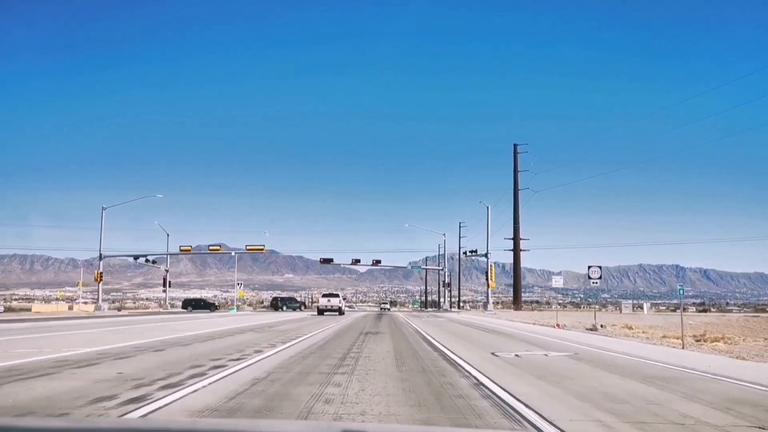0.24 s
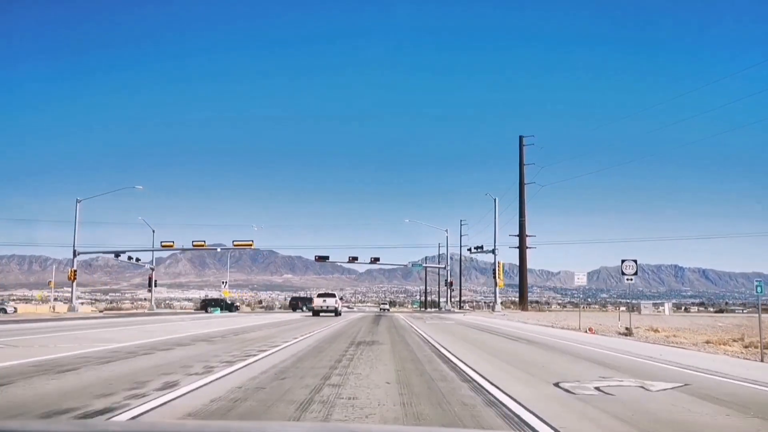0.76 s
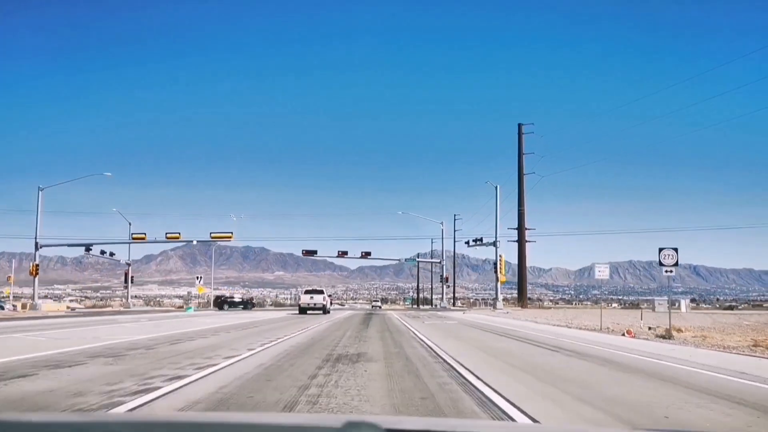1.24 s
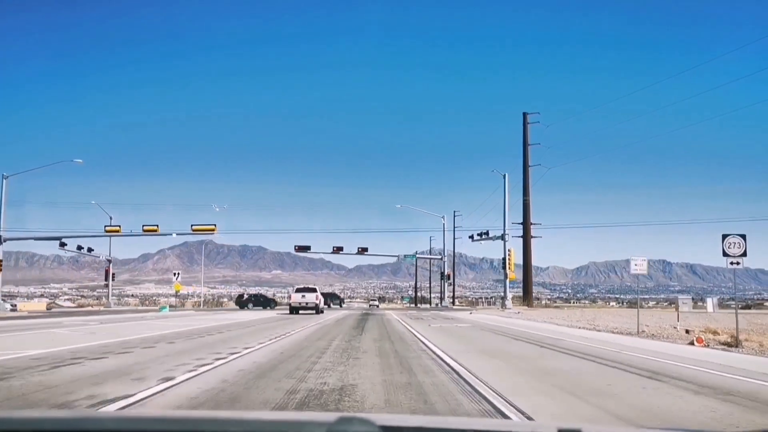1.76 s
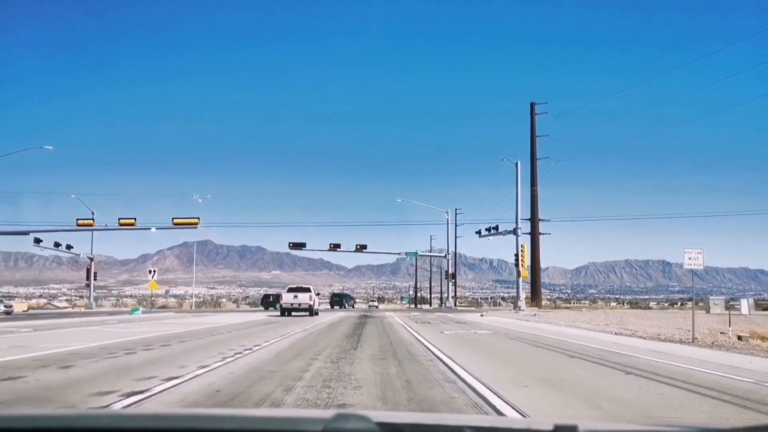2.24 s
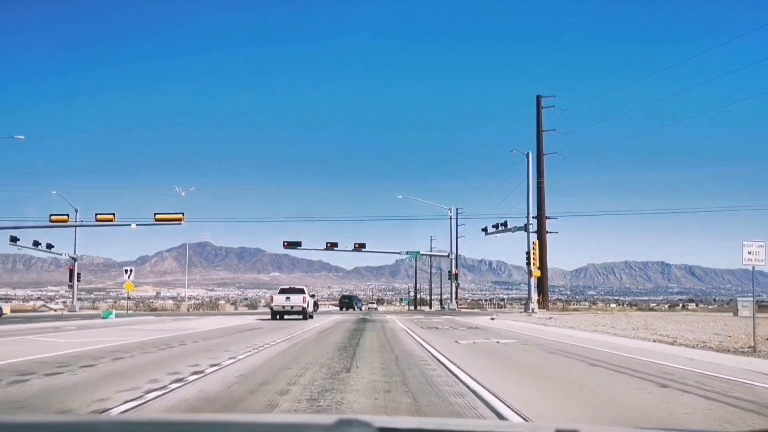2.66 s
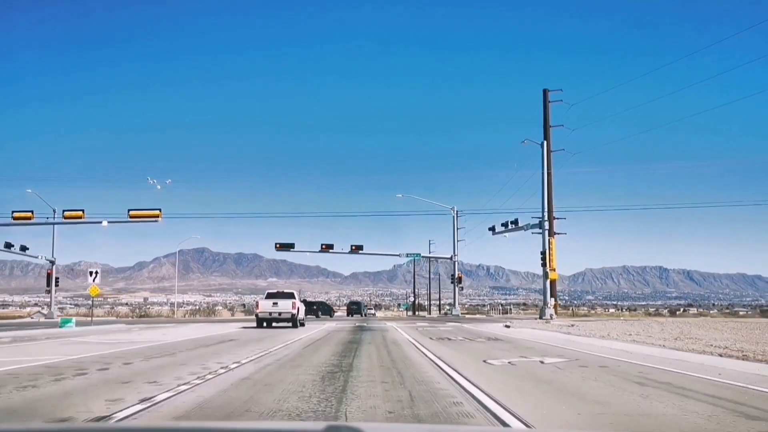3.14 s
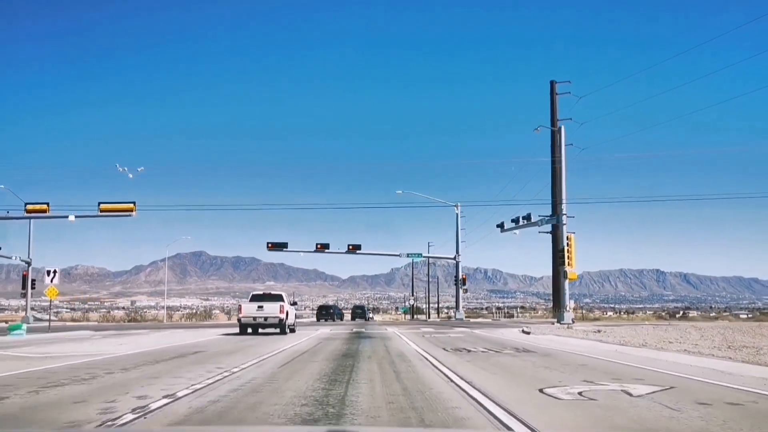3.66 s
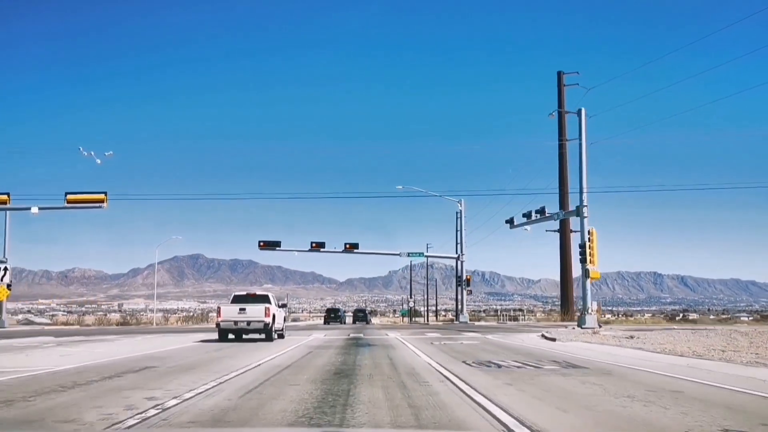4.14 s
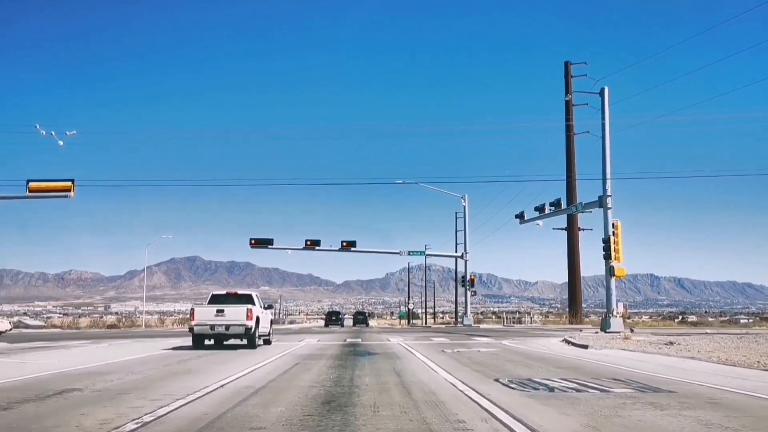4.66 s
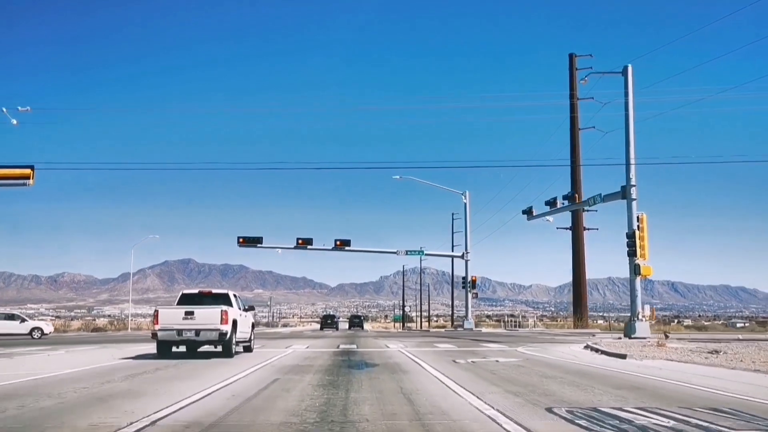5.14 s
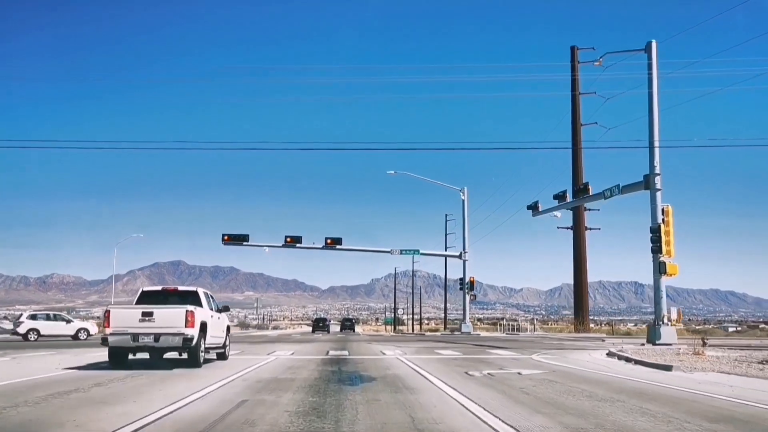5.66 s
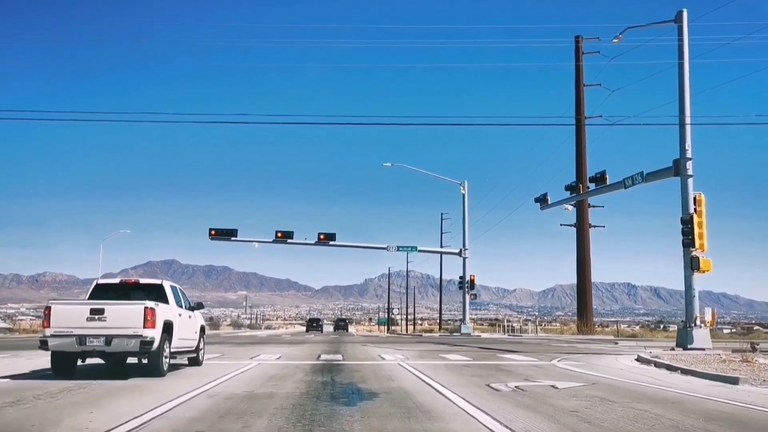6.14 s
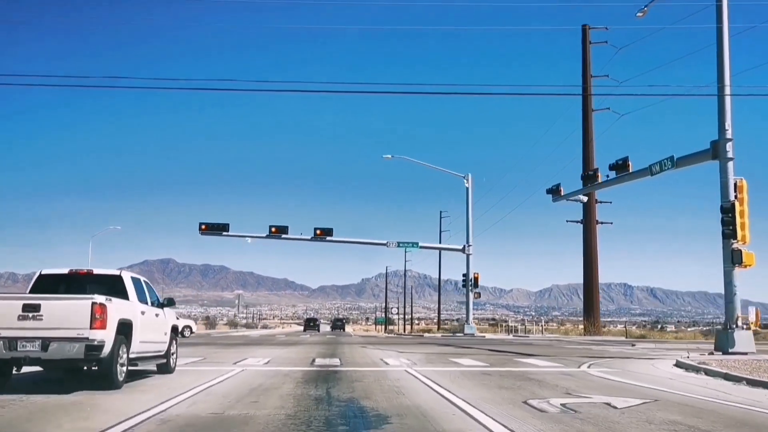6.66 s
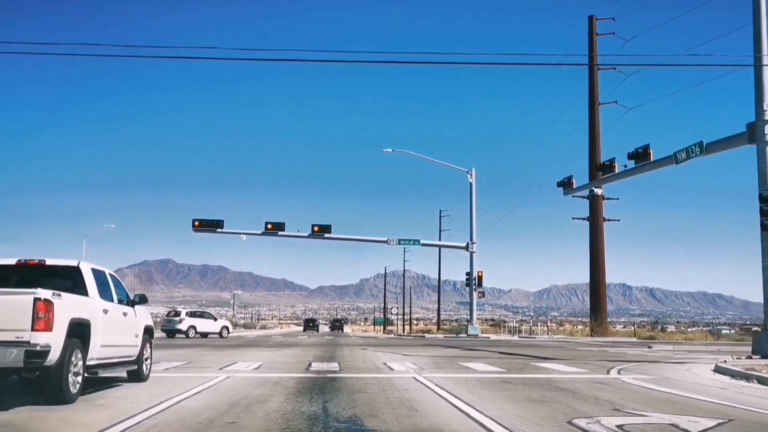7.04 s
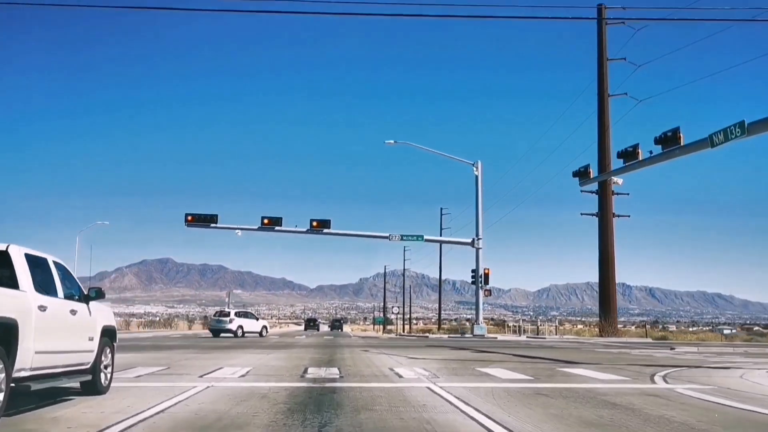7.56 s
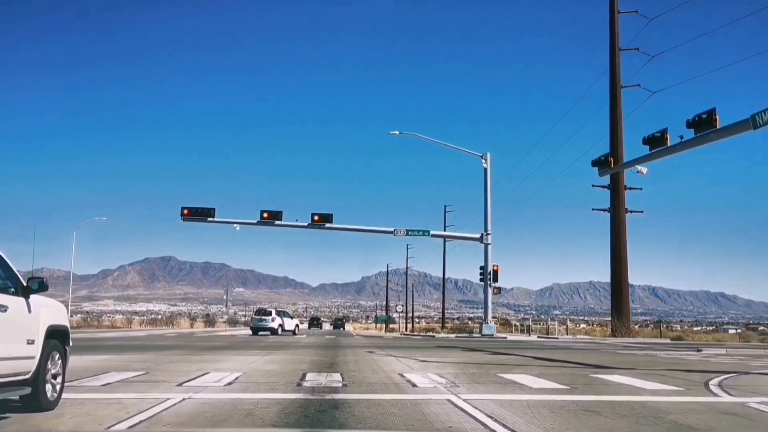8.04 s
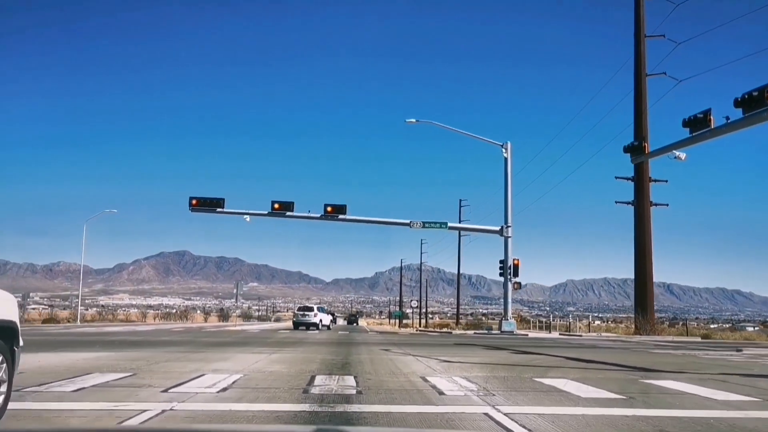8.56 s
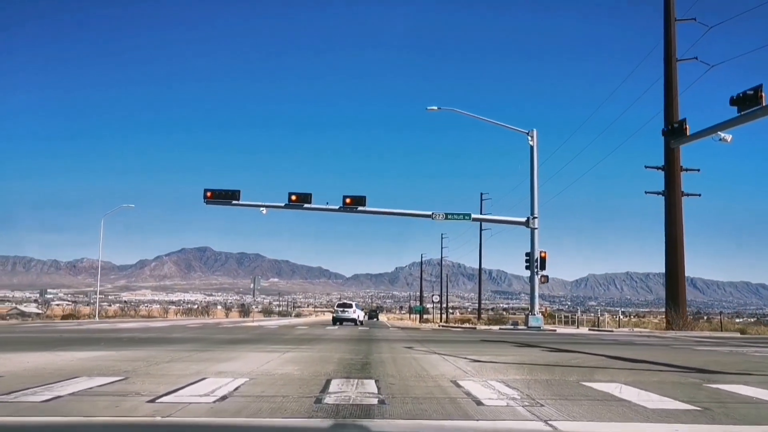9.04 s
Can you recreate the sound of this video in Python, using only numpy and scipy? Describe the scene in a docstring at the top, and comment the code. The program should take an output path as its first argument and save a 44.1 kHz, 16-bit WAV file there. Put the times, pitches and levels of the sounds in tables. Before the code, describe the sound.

Inside a slowing car, a deep booming road rumble and tyre hum sink steadily, with light rattles, a faint brake squeal and a late plastic click.

```python
"""The road shakes a car body into a low, booming rumble as the car coasts and brakes towards a red light.
The tyres hum lower and roar less as the speed falls, over grit crackle, scuffs and soft bumps; the engine hums.
Loose trim rattles at first, a brake squeals faintly in bursts, and plastic clicks near the end.
Small dashboard ticks come and go; vent air hisses throughout.
Noise is coloured and levelled by curves, hums are sines on pitch curves, struck parts are resonators."""
import sys
import numpy as np
from scipy import signal
from scipy.fft import rfft, irfft, next_fast_len
from scipy.io import wavfile
from scipy.ndimage import uniform_filter1d

SR = 44100
rng = np.random.default_rng(int(sys.argv[2]) if len(sys.argv) > 2 else 0)


def log_audio(samples):
    """Write samples as a 16-bit WAV file to the path given in sys.argv[1]."""
    # one column per channel
    frames = np.atleast_2d(samples).T
    # limit to full scale, then quantise
    limited = np.clip(frames, -1, 1)
    pcm = np.round(limited * 32767).astype(np.int16)
    wavfile.write(sys.argv[1], SR, pcm)


N = 410113
TIME = np.arange(N) / SR

# car speed as a share of a reference speed [time_s, speed_share]
SPEED = [(0, 0.96), (1.5, 0.78), (3, 0.66), (4.2, 0.52), (5.4, 0.42), (6.9, 0.31), (7.6, .26), (9.3, 0.22)]
# worn asphalt on the way up to the junction [time_s, extra_shake_db]
WEAR = [(0, 2), (1.3, -0.5), (2.1, 1), (3.9, -1.5), (4.4, 2), (5.7, 6.5), (6.4, 6), (7.15, 6), (7.45, 1),
        (8.2, 1.5), (9.3, -1.5)]
# noise colours of vent air and tyre scuffs [freq_hz, relative_db_per_hz]
VENT = [(500, -2), (1500, 11.5), (2400, 5.5), (3100, 1.5), (4000, -1), (4500, 1), (5200, -3.5), (5650, -6),
        (6600, -5.5), (7500, -8), (9300, -9.5), (10500, -5), (12500, -10.5), (16000, -12)]
SCUFF = [(700, 1), (1500, 3), (2300, 0.5), (3000, -7.5), (5100, -14), (5900, -22), (9000, -25)]


def from_db(db):
    """Decibels to gain."""
    return 10 ** (np.asarray(db) / 20)


def rms_one(x):
    """Scale to unit power."""
    return x / np.sqrt(np.mean(x ** 2) + 1e-20)


def in_time(rows):
    """Each column of a curve, sample by sample."""
    s, *columns = np.transpose(rows)
    return [np.interp(TIME, s, c) for c in columns]


def at_hz(points, hz):
    """Read a table along log frequency."""
    f, value = np.transpose(points)
    return np.interp(np.log(hz), np.log(f), value)


def hump(x, centre, width):
    """A bell of height 1, down to 1/e at one width from the centre."""
    return np.exp(-np.minimum(((x - centre) / width) ** 2, 50))


def drift(rate_per_s):
    """Random wander of unit power through 4096 knots; once they run out, the last value holds."""
    knots = rng.standard_normal(4096)
    return rms_one(np.interp(TIME * rate_per_s, np.arange(len(knots)), knots))


def by_speed(level_db, fall_db):
    """Level at the reference speed, less fall_db for each tenfold drop in speed."""
    speed, = in_time(SPEED)
    return level_db + fall_db * np.log10(np.maximum(speed, 1e-3))


def cabin_noise(colour, steady_s=0):
    """Stereo noise: long waves reach both ears alike, those near 1-2 kHz differ most, high treble is alike again."""
    # likeness of the two ears [freq_hz, correlation]
    likeness = [(30, .993), (150, .98), (300, .87), (550, .58), (900, .15), (1400, -.22), (2200, .05),
                (4500, .3), (8000, .75), (12000, .98)]
    # level balance of the ears [freq_hz, left_minus_right_db]
    balance = [(30, -4), (80, -3.5), (170, -1.3), (550, 1), (1000, -1.5), (1300, -0.5), (1600, -2.5),
               (1920, -7.5), (2120, -5), (2340, -3.5), (3200, 0), (4500, -2), (5200, -4), (8000, 0),
               (13000, 5)]
    # phase lead of the right ear [freq_hz, lead_rad]
    right_lead = [(30, .1), (90, 0.32), (170, 0.14), (400, 0.016)]
    size = next_fast_len(N)
    hz = np.maximum(np.arange(size // 2 + 1) * SR / size, 1)
    octaves_outside = np.abs(np.log2(hz / np.clip(hz, colour[0][0], colour[-1][0])))
    gain = from_db(at_hz(colour, hz) - 30 * octaves_outside)
    alike = np.clip(at_hz(likeness, hz), -.999, .999)
    mid, side = rfft(rng.standard_normal((2, size)))
    ears = np.array([[1], [-1]])
    pair = np.sqrt(1 + alike) * mid + ears * np.sqrt(1 - alike) * side
    pair = pair * np.exp(-.5j * ears * at_hz(right_lead, hz))
    pair = pair * gain * from_db(ears * at_hz(balance, hz) / 2)
    x = irfft(pair, size)[:, :N]
    power = x.mean(axis=0) ** 2
    if steady_s:  # even out the power over this span
        span = max(int(steady_s * SR), 2)
        smooth_power = uniform_filter1d(uniform_filter1d(power, span), span)
        return x / np.sqrt(smooth_power + 1e-20)
    return x / np.sqrt(power.mean())


def tone(hz):
    """A sine of unit power along a pitch curve."""
    return np.sqrt(2) * np.sin(2 * np.pi * np.cumsum(hz) / SR)


def ring(drive, hz, t60_s):
    """Two-pole resonator: a unit click starts a decaying sine of initial height 1."""
    r = from_db(-60 / (t60_s * SR))
    w = 2 * np.pi * hz / SR
    return signal.lfilter([0, np.sin(w)], [1, -2 * r * np.cos(w), r * r], drive + 1e-18)


def panned(x, left_db):
    """Make the left ear louder than the right by left_db."""
    return x * from_db(np.array([[.5], [-.5]]) * left_db)


def chatter(events, colour, rough_db):
    """Short, uneven noise bursts of tiny contacts, rising and falling exponentially."""
    bursts = 0
    for s, db, decay_s in events:
        bursts = bursts + from_db(db) * np.exp(-np.minimum(np.abs(TIME - s) / decay_s, 30))
    return bursts * from_db(rough_db * drift(400)) * cabin_noise(colour)


def shudders(events, colour):
    """Brief noise swells, each shaking one damped resonance."""
    shake = cabin_noise(colour)
    out = 0
    for s, db, half_width_s, hz in events:
        out = out + from_db(db) * hump(TIME, s, half_width_s) * rms_one(ring(shake, hz, t60_s=0.023))
    return out


def reflected(x, echo_db, count=10):
    """Early echoes off glass and dashboard ripple the spectrum."""
    out = x.copy()
    lags_s = rng.uniform(.001, .012, count)
    for lag in (lags_s * SR).astype(int):
        out[:, lag:] += rng.choice([-1, 1]) * from_db(echo_db) * x[:, :-lag]
    return out / np.sqrt(1 + count * from_db(2 * echo_db))


def patchy(x, count=12):
    """Overlapping treble bands swell and sink separately; the end bands take all beyond them."""
    size = next_fast_len(N)
    spectrum = rfft(x, size)
    hz = np.arange(size // 2 + 1) * SR / size
    centres_hz = np.geomspace(2400, 6500, count)
    out = 0
    for weights in np.eye(count):
        band = irfft(spectrum * np.interp(hz, centres_hz, weights), size)[:, :N]
        out = out + band * from_db(2.8 * drift(30))
    return out


def body():
    """Uneven asphalt bounces the wheels, shakes the shell and makes panels boom; smooth patches calm it."""
    # wheels on springs, shell rumble, lower and upper panel boom [freq_hz, relative_db_per_hz]
    bounce_colour = [(10, -22.5), (18, -2), (24, -2), (31, -0.5), (38, -5.5), (50, -26)]
    rumble_colour = [(24, -11.5), (32, -4.5), (39, 4.5), (49, 1), (58, -7.5), (72, -23.5)]
    boom_colour = [(52, -19), (66, -4.5), (76, 2), (92, 0), (105, -1), (135, -8), (153, -15), (180, -30.5)]
    upper_colour = [(135, -21.5), (158, -4), (178, 0), (205, -0.5), (218, -4.5), (232, -9), (280, -31.5)]
    # wheels dropping into dips [time_s, half_width_s, rumble_lift_db, boom_lift_db]
    jolts = [(.37, 0.16, 5, 2), (.728, 0.068, 4.5, 9), (.95, 0.075, 6, 2.5), (1.3, 0.098, -0.5, 6),
             (1.51, 0.11, 2.5, 5), (1.887, 0.066, -2.5, 4), (2.63, 0.067, -0.5, 4), (2.78, 0.019, 6, 2.5),
             (3.45, 0.19, 1.5, -0.5), (3.743, 0.027, 5, 5), (4.171, 0.027, 8.5, 5), (4.573, 0.063, 2, 5),
             (5.8, 0.054, -0.5, 5), (6.575, .035, 6.5, 8), (6.83, 0.08, -3.5, 4.5), (7.15, .1, 3.5, 2),
             (8.918, 0.11, 6.5, -2.5), (9.22, .072, -.5, 6)]
    # smooth asphalt [time_s, half_width_s, rumble_drop_db, boom_drop_db]
    lulls = [(1.7, 0.098, 0.5, 5.5), (2.23, 0.074, 7, -2), (2.95, 0.097, 6, 1), (3.88, 0.063, 6, 0.5),
             (5.07, 0.04, 12, 6), (6.33, 0.15, 5, 0.5)]
    # side whose wheels shake more [time_s, extra_left_minus_right_db]
    lean = [(0, 1), (2.3, 0.5), (3.8, -1), (7.2, -1), (8.1, 1.5)]
    wear_db, = in_time(WEAR)
    lean_db, = in_time(lean)
    shake_db = wear_db + 2.0 * drift(18)
    surge_db = 2.0 * drift(16)
    for rows, sign in ((jolts, 1), (lulls, -1)):
        for s, half_width_s, rumble_change_db, boom_change_db in rows:
            swell = sign * hump(TIME, s, half_width_s)
            shake_db = shake_db + rumble_change_db * swell
            surge_db = surge_db + boom_change_db * swell
    bounce_db = by_speed(-33.5, fall_db=8.5) + shake_db
    rumble_db = by_speed(-24.5, fall_db=19) + shake_db
    boom_db = by_speed(-24.5, fall_db=21) + 0.46 * wear_db + surge_db
    upper_db = by_speed(-32, fall_db=24) + 0.96 * surge_db
    bounce = from_db(bounce_db) * cabin_noise(bounce_colour, steady_s=0.31)
    rumble = from_db(rumble_db) * cabin_noise(rumble_colour, steady_s=0.15)
    boom = from_db(boom_db) * cabin_noise(boom_colour, steady_s=0.1)
    upper = from_db(upper_db) * cabin_noise(upper_colour, steady_s=0.22)
    return panned(bounce + rumble, lean_db) + panned(boom + upper, 1.2 * lean_db)


def tyres():
    """Tread drone, rolling roar and a rush of air and tread hiss, all fading as speed falls."""
    # noise colours [freq_hz, relative_db_per_hz]
    drone_colour = [(190, -31.5), (228, -0.5), (285, 1), (315, -6.5), (340, -3), (385, -8), (425, -19),
                    (520, -46.5)]
    roar_colour = [(300, -15), (400, -3), (450, -2), (515, 1.5), (560, -1.5), (610, 1), (700, -5.5),
                   (770, -8.5), (950, -11.5), (1080, -18), (1220, -19.5), (1700, -34)]
    rush_colour = [(650, -7), (800, 5), (1000, 10), (1180, 0), (1300, 3), (1540, 5.5), (1680, -1.5),
                   (1820, 1), (1920, 6), (2060, -1), (2340, 3.5), (2470, -8.5), (2600, -6.5), (3100, -12.5),
                   (5000, -25), (5700, -29), (12000, -36)]
    speed, = in_time(SPEED)
    wear_db, = in_time(WEAR)
    grain = drift(40)  # road surface texture
    # the tread pattern meets the tyre's air resonance near one speed share
    cavity_db = 1.5 * hump(speed, centre=0.48, width=0.18)
    drone_db = by_speed(-39.5, fall_db=19) + cavity_db
    roar_db = by_speed(-49.5, fall_db=24) + 1.2 * grain
    rush_db = by_speed(-57, fall_db=41.5) + 0.31 * wear_db + 1.4 * grain
    drone = from_db(drone_db) * cabin_noise(drone_colour, steady_s=0.93)
    roar = from_db(roar_db) * cabin_noise(roar_colour)
    rush = from_db(rush_db) * cabin_noise(rush_colour)
    return drone + roar + rush


def tread():
    """Tread blocks drum a narrow noise band, made of three sines with random amplitude and wavering pitch."""
    # tread hum, sinking as the car slows [time_s, pitch_hz, level_db]
    tread_curve = [(1.5, 439.7, -62.5), (2.4, 380, -50.5), (3.2, 324.2, -50.5), (3.8, 305, -44),
                   (4.5, 305.8, -46.5), (5.2, 279.9, -44.5), (6.1, 250.3, -50.5), (6.45, 226.4, -50),
                   (6.8, 155.3, -42), (7.3, 138.6, -59.5)]
    hz, level_db = in_time(tread_curve)
    hum = 0
    for _ in range(3):
        hum = hum + drift(65) * tone(hz * (1 + 0.03 * drift(20)))
    return panned(from_db(level_db) * rms_one(hum), left_db=1.7)


def grit():
    """Fine grit crackles under the tread, thickest on one coarse stretch; rougher spots scuff the tyres."""
    # grit crackle colour [freq_hz, relative_db_per_hz]
    grit_colour = [(1500, -8), (2600, 1), (3400, 0.5), (4000, -2), (4400, -0.5), (5200, -1), (5700, -18),
                   (6600, -13.5), (9000, -17.5)]
    # scuffs over patches and painted lines [time_s, level_db, decay_s]
    scuffs = [(4.345, -65, .012), (4.4, -62.5, .009), (5.78, -74, 0.074), (6.1, -67, .086),
              (6.57, -71, 0.074), (6.84, -71.5, .055), (7.03, -70.5, 0.033)]
    coarse_db = 2 * hump(TIME, centre=3.25, width=0.44)
    level_db = by_speed(-76.5, fall_db=11.5) + coarse_db
    flicker_db = 1.6 * drift(45) + 2.2 * drift(550)
    crackle = from_db(level_db + flicker_db) * patchy(cabin_noise(grit_colour))
    return reflected(crackle + chatter(scuffs, SCUFF, rough_db=4.5), echo_db=-13)


def bumps():
    """Soft road bumps, each shaking one panel resonance."""
    # bumps [time_s, level_db, half_width_s, pitch_hz]
    bump_events = [(2.728, -59.5, 0.011, 1554), (3.172, -55, 0.02, 520), (5.76, -61.5, .015, 620),
                   (6.521, -57.5, 0.02, 730), (7.077, -58.5, .014, 620), (7.578, -63, .019, 550),
                   (7.88, -64.5, .035, 560), (8.45, -62, 0.016, 700)]
    return shudders(bump_events, SCUFF)


def engine():
    """Two engine orders hum unevenly through the bulkhead and sink towards idle."""
    # upper order [time_s, pitch_hz, level_db before a 2.5 dB cut]
    engine_curve = [(0, 212.8, -40), (2.7, 210.7, -42), (4.5, 206.3, -45), (6, 201.5, -50),
                    (6.9, 194.6, -43), (7.6, 191.9, -46.5), (8.4, 191, -50.5), (9.3, 190.5, -49)]
    hz, level_db = in_time(engine_curve)
    hz = hz * (1 + 0.015 * drift(25))
    hum = tone(hz) * from_db(level_db - 2.5 + 3.0 * drift(12))
    low = tone(.6 * hz) * from_db(-45.5 + 1.1 * drift(8.8))
    return panned(hum + low, left_db=-2.0)


def trim():
    """A loose panel buzzes and frets; each jolt is shared differently between its edge, face and clips."""
    # rattles [time_s, edge_level_db before a 0.4 dB cut, decay_s, face_minus_edge_db, clips_minus_edge_db]
    rattles = [(.12, -55.5, 0.0078, 1.5, -9), (0.265, -61.5, 0.012, 7, -3.5),
               (0.414, -69, 0.0081, 10, -2.5), (0.564, -71, 0.0068, 9, -.5),
               (0.708, -64.5, 0.0096, 4.5, -4), (.867, -66.5, .013, 4, -2), (1.02, -69.5, .039, 7.5, -9),
               (1.173, -72, .014, 6.5, -1.5), (1.302, -70, .009, 5.5, -6)]
    # edge, face and clip colours [freq_hz, relative_db_per_hz]
    edge_colour = [(3000, -24.5), (3900, -8.5), (4400, 1.5), (4800, -1.5), (5200, 1.5), (5800, -16),
                   (7000, -22)]
    face_colour = [(1200, -12), (1900, 2.5), (2500, -1.5), (2900, -11), (3600, -17)]
    clips_colour = [(5700, -9.5), (6200, 1), (6650, 0.5), (7300, -17.5), (8500, -12.5), (9700, -8.5),
                    (10400, -6.5), (11200, -5.5), (12000, -17), (15500, -24)]
    # single clips ringing briefly [time_s, level_db, half_width_s, pitch_hz]
    clip_rings = [(.72, -69.5, .019, 6450), (.968, -60.5, .005, 4470), (3.3, -75, .04, 4530),
                  (8.55, -81, .02, 4500)]
    edge_hits = [(s, db, decay_s) for s, db, decay_s, _, _ in rattles]
    face_hits = [(s, db + knock_db, decay_s) for s, db, decay_s, knock_db, _ in rattles]
    clip_hits = [(s, db + sizzle_db, decay_s) for s, db, decay_s, _, sizzle_db in rattles]
    edge = chatter(edge_hits, edge_colour, rough_db=2.5)
    face = chatter(face_hits, face_colour, rough_db=2.5)
    clips = chatter(clip_hits, clips_colour, rough_db=3.0)
    fret_gain = from_db(-88 + 3.0 * drift(35) + 3.5 * drift(600))
    fret = fret_gain * hump(TIME, centre=.55, width=0.76) * cabin_noise(clips_colour)
    buzz = from_db(-0.4) * (edge + face + clips) + fret
    return panned(reflected(buzz, echo_db=-13.5) + shudders(clip_rings, VENT), left_db=-1.5)


def click():
    """A plastic catch knocks, snaps and rattles to rest; each contact favours the modes near its centre."""
    # contacts [time_s, level_db before a 4.5 dB cut, centre_hz]
    contacts = [(9.0915, -51, 1350), (9.094, -55, 1450), (9.1005, -43.5, 2400), (9.1045, -57, 4500),
                (9.109, -56, 1900), (9.1145, -56, 5600), (9.1235, -54, 4100), (9.134, -63, 2350),
                (9.142, -66, 2100)]
    # plastic modes [freq_hz, relative_db, t60_s]
    modes = [(1450, 1, .02), (1680, -8, .025), (2090, -1.5, .042), (2215, -2, .026), (2340, -5, .02),
             (2460, -6, .022), (2560, -8, .035), (3350, -16, .04), (4086, -10, .03), (4690, -8, .03),
             (5300, -13, .04)]
    s, db, centre_hz = np.transpose(contacts)
    out = np.zeros((2, N))
    for hz, mode_db, t60_s in modes:
        octaves_off = np.abs(np.log2(hz / centre_hz))
        hits = np.zeros(N)
        hits[(s * SR).astype(int)] = from_db(db - 17 * octaves_off)
        band = signal.butter(1, [hz * .85, hz * 1.15], "band", fs=SR, output="sos")
        mode = signal.sosfilt(band, ring(hits, hz, t60_s))
        out += from_db(mode_db + rng.normal(0, 1.3, (2, 1))) * mode  # each ear differs a little
    return panned(from_db(-4.5) * out, left_db=-8)


def brake():
    """The pad sets one high disc mode singing: a quick rise, a hold, a stuttering fade."""
    # squeals [peak_s, level_db, hold_s]
    squeals = [(6.44, -93, .09), (6.795, -86.5, .07), (6.94, -93.5, .13), (7.092, -87, .02),
               (7.17, -79.5, .03), (7.28, -95, .08), (7.385, -89, .02), (7.55, -76, .06), (7.67, -78, .035),
               (7.77, -86, .02), (7.96, -91, .02), (8.013, -71, .03), (8.103, -78.5, .02),
               (8.205, -87, .04)]
    # pitch of the singing disc [time_s, pitch_hz]
    squeal_pitch = [(7.2, 7295), (7.42, 7370), (7.55, 7297), (7.8, 7335), (8, 7295), (8.24, 7365)]
    attack_s, release_db_per_s = 0.016, 203.5
    singing = 0
    for s, db, hold_s in squeals:
        rise = hump(np.minimum(TIME, s), s, attack_s)
        fade_db = release_db_per_s * np.maximum(TIME - s - hold_s, 0)
        singing = np.maximum(singing, rise * from_db(db - fade_db))
    hz, = in_time(squeal_pitch)
    hz = hz * (1 + 0.002 * drift(300))
    stutter = from_db(2.0 * drift(90))
    return panned(singing * stutter * tone(hz), left_db=1.0)


def ticks():
    """Small dashboard ticks: brief bursts of bright noise."""
    # ticks [time_s, level_db, decay_s]
    tick_events = [(1.025, -72, .012), (1.865, -77, 0.0078), (2.38, -72.5, 0.0088), (2.92, -74, .014),
                   (7.468, -74, .004), (8.489, -69, 0.011), (8.81, -75, .0065)]
    # tick colour [freq_hz, relative_db_per_hz]
    tick_colour = [(3500, -23.5), (5200, -1.5), (6800, -3), (7400, -6), (8000, 4.5), (9300, -12),
                   (10600, -7), (12000, -15.5), (16000, -22)]
    return chatter(tick_events, tick_colour, rough_db=2.0)


def vent():
    """Vent air: steady coloured noise with early echoes."""
    return from_db(-77.5) * reflected(cabin_noise(VENT), echo_db=-14.5)


def scene():
    """Everything heard from behind the windscreen."""
    road = body() + tyres() + tread() + grit() + bumps()
    return road + engine() + trim() + click() + brake() + ticks() + vent()


def record(dry):
    """A steep low-pass cuts the top."""
    low_pass = signal.ellip(10, .1, 80, 15720, fs=SR, output="sos")  # order, ripple_db, stop_db, cutoff_hz
    return signal.sosfilt(low_pass, dry)


dry = scene()
out = record(dry)
log_audio(out)
```